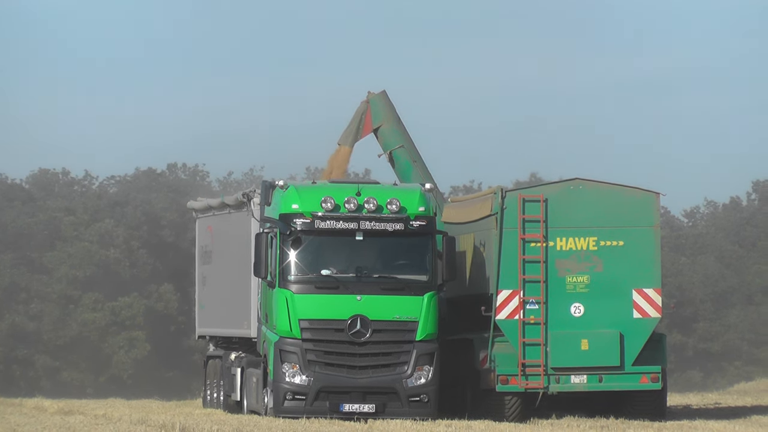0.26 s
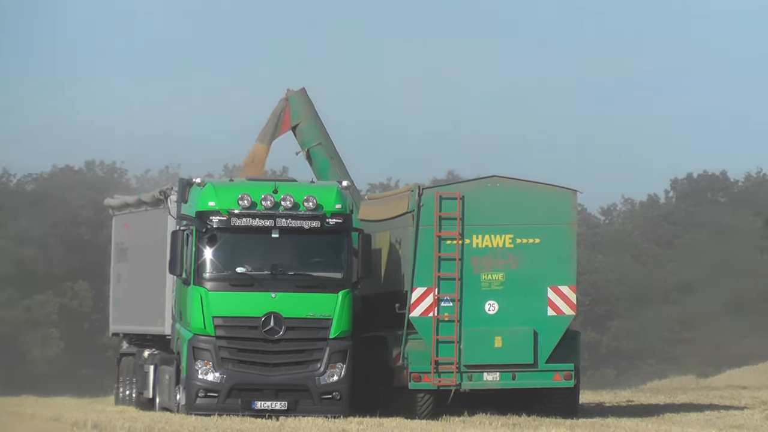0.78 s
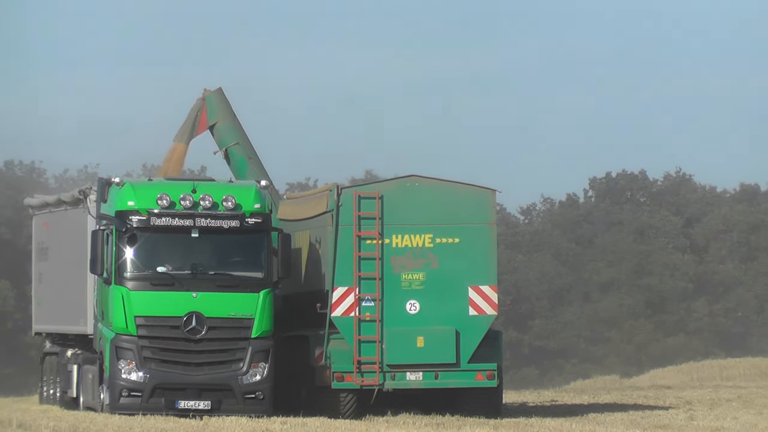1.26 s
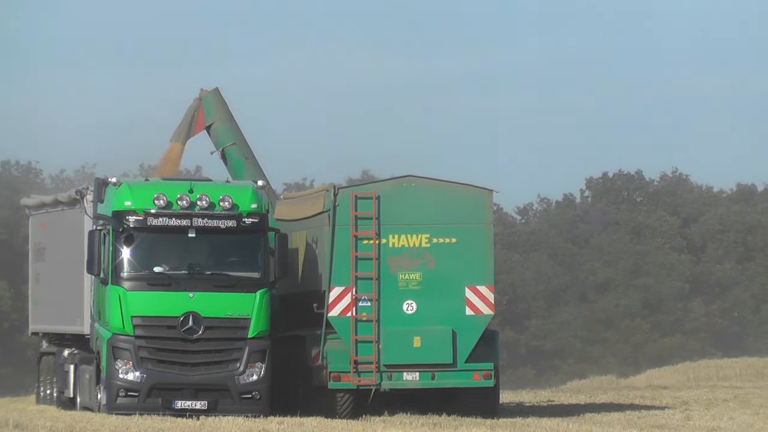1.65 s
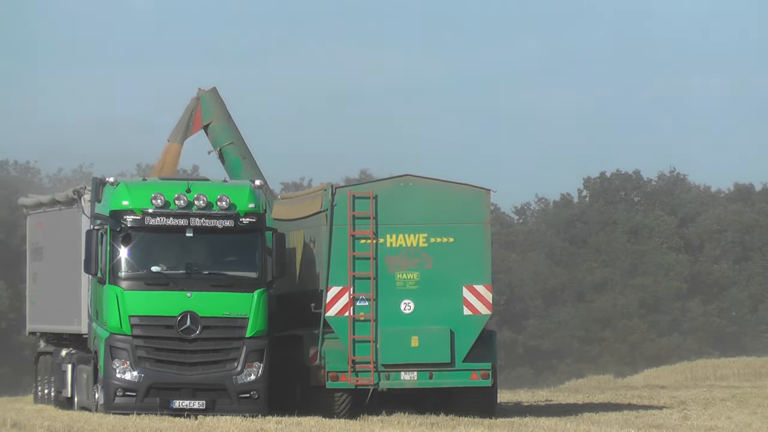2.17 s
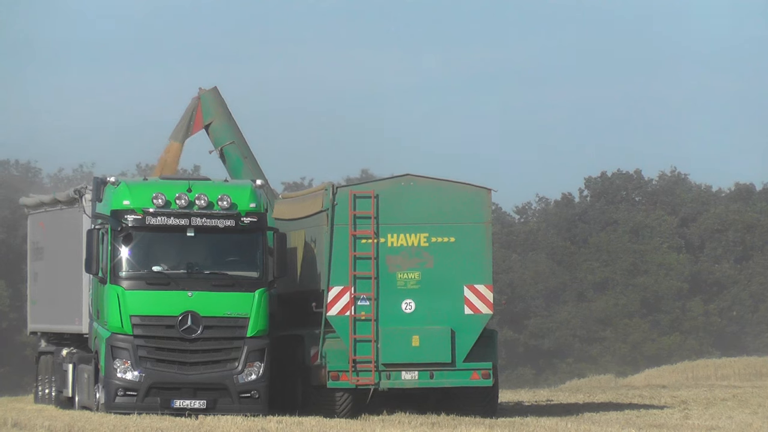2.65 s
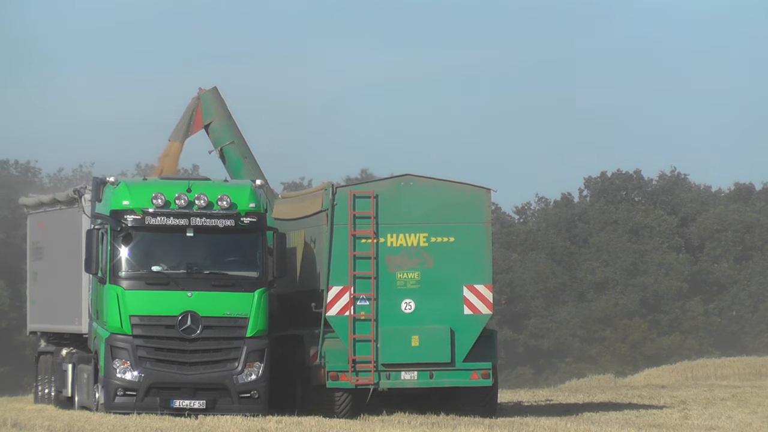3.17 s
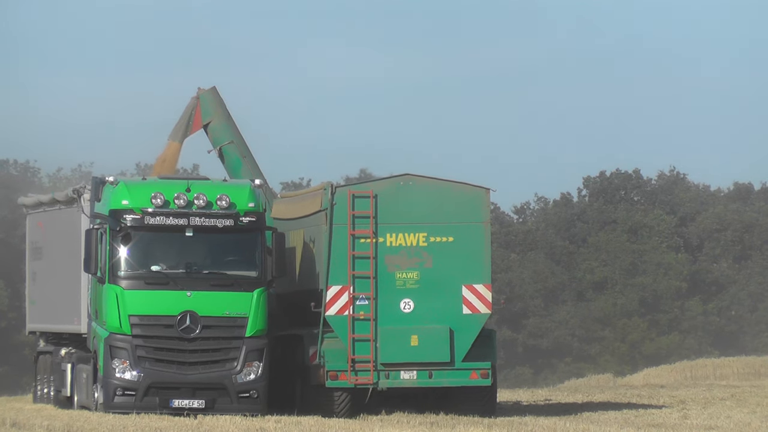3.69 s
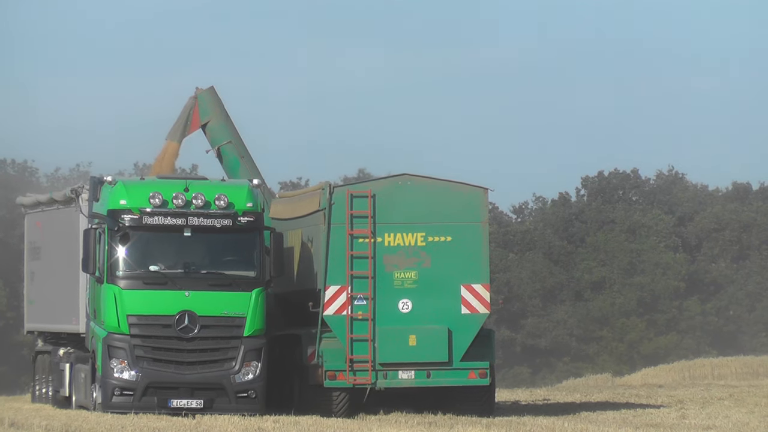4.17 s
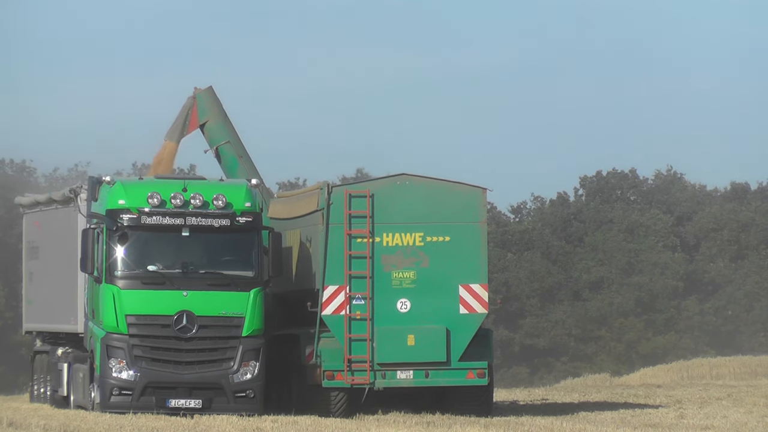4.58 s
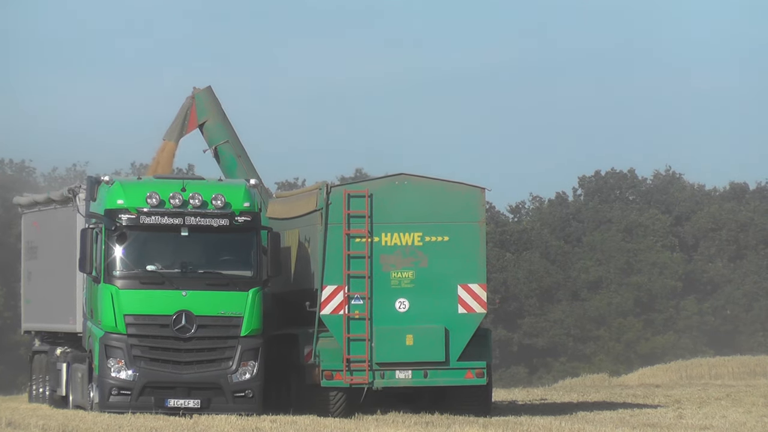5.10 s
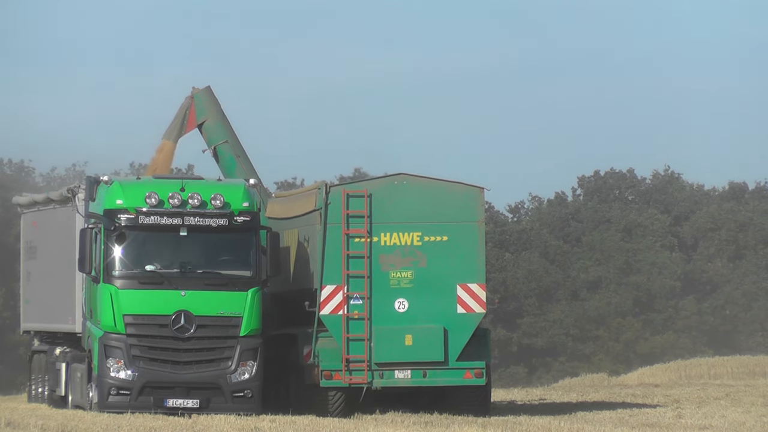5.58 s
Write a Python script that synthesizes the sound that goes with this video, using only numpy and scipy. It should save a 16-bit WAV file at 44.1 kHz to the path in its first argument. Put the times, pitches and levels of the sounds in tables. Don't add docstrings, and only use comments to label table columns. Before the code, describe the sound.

A continuous machine bed of low engine hum, rough tube roar, grain hiss and steady high whine, slightly hollow and phasey from a small camera's microphones. Close, bright straw brushing and brittle ticks crowd the middle, with one dominant snap; afterwards the quieter machine creeps back up, with a few isolated ticks.

```python
import sys
import numpy as np
from scipy import signal
from scipy.fft import rfft, irfft, next_fast_len
from scipy.io import wavfile
from scipy.ndimage import uniform_filter1d, map_coordinates

SR = 44100
rng = np.random.default_rng(int(sys.argv[2]) if len(sys.argv) > 2 else 0)


def pcm_store(signal):
    levels = np.round(np.clip(np.atleast_2d(signal), -1, 1) * 32767)
    wavfile.write(sys.argv[1], SR, levels.astype(np.int16).T)


def decibels_to_gain(level_db):
    exponent = np.asarray(level_db, float) / 20
    return 10 ** exponent


N = 257544

# (time [s], level [dB])
ENGINE_LEVEL = [
    (0, -28),
    (1, -29),
    (1.6, -27.5),
    (2.5, -30),
    (2.8, -28.5),
    (3.5, -26),
    (4.5, -28.5),
    (5.84, -26.5),
]
# (frequency [Hz], level [dB rms])
ENGINE_ORDERS = [(76.8, -43.5), (113, -32.5), (129, -35), (146, -48.5), (163, -40.5), (184, -43.5)]
# (frequency [Hz], density [dB per Hz])
EXHAUST_COLOUR = [(15, -60), (25, -46), (39, -25.5), (50, -23), (62, -17.5), (81, -13.5), (102, -1.5),
                  (125, 3), (160, -3), (195, -6.5), (265, -19.5), (480, -26.5), (620, -61), (1060, -120)]
# (frequency [Hz], density [dB per Hz])
TUBE_COLOUR = [(250, -72), (400, -8.5), (550, -1), (720, 3), (1050, 0.5), (1400, 2), (1800, -5.5),
               (2100, -15), (2600, -44)]
# (frequency [Hz], width [Hz], level [dB])
HOPPER_MODES = [
    (603, 253, 2),
    (773, 107, 4.5),
]
# (frequency [Hz], density [dB per Hz])
GRAIN_COLOUR = [(1500, -8), (2000, -21), (2300, -3.5), (2600, -3), (2900, 0.5), (3300, 0), (3700, -2),
                (4100, -2), (4500, -2.5), (5000, -5), (5700, -8.5), (6600, -13), (7600, -30), (8200, -55)]
# (time [s], frequency [Hz])
MESH_PITCH = [(0, 1665), (.6, 1663), (1.5, 1671), (2.05, 1671), (2.3, 1661), (4.2, 1658), (5.84, 1658)]
# (time [s], lag [ms])
MIRROR_LAG = [(0, .93), (1, .925), (1.8, .88), (2.1, .89), (2.4, 1.12), (2.67, 1.3), (3.1, 1.17),
              (3.6, 1.21), (3.95, 1.17), (4.5, 1.27), (4.85, 1.34), (5.4, 1.395), (5.84, 1.34)]
# (frequency [Hz], level [dB])
MIRROR_COLOUR = [(200, -8.5), (600, -2), (1200, -9.5), (2000, -12), (3000, -1.5), (4500, -7.5), (6500, -13),
                 (9000, -25)]
# (frequency [Hz], density [dB per Hz])
HISS_COLOUR = [(6000, -11), (7000, 0), (7500, -4), (8300, -11.5), (9600, -7.5), (11500, -11),
               (13500, -12.5), (14600, -15), (15300, -25), (15800, -28), (16100, -70)]
# (frequency [Hz], density [dB per Hz])
STRAW_COLOUR = [(1500, -20.5), (3000, -11), (5000, 8), (7000, 5), (8200, -4), (10000, -0.5), (12500, -8),
                (15000, -13), (16000, -14)]
# (start [s], hold [s], stalks [dB], chaff [dB])
STRAW_STROKES = [(1.85, 0.91, -59, -68), (2.08, 0.055, -58, -75), (2.3, 0.13, -52, -72),
                 (2.568, 0.54, -40.5, -47), (2.735, 0.055, -40.5, -52), (3.128, .12, -40, -40),
                 (3.267, .2, -49, -46), (3.503, .55, -51.5, -64), (3.656, 0.1, -45, -60),
                 (3.928, 0.093, -52, -68), (4.196, .2, -53.5, -70)]
# (time [s], bright peak [dB], dull peak [dB], tick [Hz])
STALK_SNAPS = [(2.1114, -18.5, -19, 11500), (2.1745, -28, -25, 9870), (2.3151, -30, -34, 13000),
               (2.4287, -34, -25, 8070), (2.5314, -46, -26, 10100), (2.8821, -24, -18, 9380),
               (2.9054, -28, -34, 9890), (2.926, -29, -23, 9830), (2.9597, -17, -31, 10200),
               (2.9846, -32, -29, 11100), (3.0236, -24, -14, 12500), (3.026, -15, -24, 11900),
               (3.1117, -30, -14.5, 9320), (3.1379, 2.5, -3, 10700), (3.1646, -12, -11.5, 11000),
               (3.235, -21, -23, 11100), (3.3012, -29, -13.5, 11260), (3.3258, -17, -36, 9280),
               (3.3424, -23, -27, 9530), (3.3922, -22, -38, 9440), (3.4042, -18, -34, 12500),
               (3.4575, -31, -37, 11500), (3.5808, -17.5, -36, 8560), (3.7135, -36, -23, 11900),
               (3.9384, -34, -26, 9840), (3.9923, -37, -24, 10700), (4.0203, -20, -31, 9750),
               (4.355, -28, -32, 11500), (4.8821, -29, -23, 11200), (5.1701, -21, -37, 11500)]
# (frequency [Hz], lag [cycles])
REAR_LAG = [(0, .2), (473, 1.5), (2002, 5.5), (2734, 7.5), (4285, 11.5), (6718, 17.5), (7515, 19.5),
            (8731, 22.5), (10045, 25.5), (10895, 27.5), (12532, 31.5), (15331, 38.5), (22050, 55.3)]
# (frequency [Hz], level [dB])
REAR_COLOUR = [(60, 9.5), (250, 1.5), (470, -2), (860, -3), (1230, -1.7), (1620, -6.5), (2000, 4),
               (2740, -2.6), (3100, -13.5), (3500, -6), (5500, -7.5), (8300, -9.5), (10000, -6.5),
               (15000, -7.5)]
# (frequency [Hz], rear share [dB], phase [rad], diffuse level [dB])
SIDE_COLOUR = [(40, -15, 3, -24), (110, -26.5, 2.1, -26), (250, -35, -1.5, -30.5), (500, -24, -2.7, -14.5),
               (810, -11.5, -3, -20), (1300, -12, -4, -18), (1770, -10, -4.5, -24), (2200, -20, -1.5, -13),
               (3020, -12.5, -2.5, -38), (3760, -23, -3, -29), (4300, -70, -5, -68)]
# (frequency [Hz], upright [dB], bent [dB], risen [dB])
BODY_SCATTER = [
    (470, -30, -11, -8),
    (838, -30, -33, -3),
    (1260, -5, -35, -6),
]

BEND_S, RISE_S, MOVE_S = 2.34, 3.53, 0.55


def unit(x):
    return x / np.sqrt(np.mean(x ** 2) + 1e-20)


def along(points, hz, column=1):
    table = np.transpose(points)
    return np.interp(np.log(hz + 1), np.log(table[0] + 1), table[column])


def curves(rows):
    s, *columns = np.transpose(rows)
    return [np.interp(np.arange(N) / SR, s, column) for column in columns]


def wobble(rate):
    knots = rng.standard_normal(int(N * rate / SR) + 4)
    return map_coordinates(knots, [np.arange(N) * rate / SR])


def filtered(x, response):
    m = next_fast_len(N + 8192)
    return irfft(rfft(x, m) * response(np.fft.rfftfreq(m, 1 / SR)), m)[..., :N]


def shape(points):
    return lambda hz: decibels_to_gain(along(points, hz)) * (hz >= points[0][0])


def modes(table):
    def response(f):
        total = 0
        for k, (centre, width, db) in enumerate(table):
            mode = 1j * f * width / (centre * centre - f * f + 1j * f * width)
            total = total + (-1) ** k * decibels_to_gain(db / 2) * mode
        return total ** 2
    return response


def rush(response, patchy_db):
    z = signal.stft(rng.standard_normal(N), nperseg=512)[2]
    field = uniform_filter1d(rng.standard_normal(z.shape), size=5, axis=0)
    field = uniform_filter1d(field, size=12, axis=1)
    noise = signal.istft(z * decibels_to_gain(patchy_db * unit(field)), nperseg=512)[1][:N]
    return unit(filtered(noise, response))


def tone(hz, wander, flutter_db, rate):
    phase = 2 * np.pi * np.cumsum(hz * np.ones(N)) / SR
    phase = phase + wander * wobble(rate) + rng.uniform(0, 2 * np.pi)
    return unit(decibels_to_gain(flutter_db * wobble(rate)) * np.sin(phase))


def ramp(middle_s, length_s):
    return np.clip((np.arange(N) / SR - middle_s) / length_s + .5, 0, 1)


def posed(upright, bent, risen):
    return upright + (bent - upright) * ramp(BEND_S, MOVE_S) + (risen - bent) * ramp(RISE_S, MOVE_S)


def engine():
    orders = sum(decibels_to_gain(db + 25.5) * tone(hz, wander=0.82, flutter_db=1.5, rate=4) for hz, db in ENGINE_ORDERS)
    exhaust = decibels_to_gain(-3.5) * rush(shape(EXHAUST_COLOUR), patchy_db=0.7)
    return decibels_to_gain(curves(ENGINE_LEVEL)[0]) * (orders + exhaust)


def auger():
    heap = ramp(4.6, 0.91)
    heap_loss_db = -1.5 * heap
    bending = np.sin(np.pi * ramp(BEND_S, MOVE_S))

    tube_db = posed(-30.5, -30, -30) + heap_loss_db
    tube = decibels_to_gain(tube_db + 0.96 * wobble(8.3)) * rush(shape(TUBE_COLOUR), patchy_db=0.68)
    hopper = decibels_to_gain(posed(-37.5, -35, -47.5)) * rush(modes(HOPPER_MODES), patchy_db=3.0)

    slugs = decibels_to_gain(0.33 * wobble(38))
    grain_db = posed(-34, -34, -33) + heap_loss_db
    grain = decibels_to_gain(grain_db) * slugs * rush(shape(GRAIN_COLOUR), patchy_db=0.84)
    spout_db = -56.5 + 12 * heap + 8 * bending
    spout = decibels_to_gain(spout_db) * rush(modes([(2875, 90, 0)]), patchy_db=0.3)

    mesh_hz, = curves(MESH_PITCH)
    whine = decibels_to_gain(-38) * tone(mesh_hz, wander=0.18, flutter_db=1.5, rate=11)
    moan_db = posed(-45.5, -41.5, -46.5) + 9 * bending + 1.5 * wobble(2.5)
    moan = decibels_to_gain(moan_db) * tone(.6195 * mesh_hz, wander=0.79, flutter_db=4.0, rate=18)
    return tube + hopper + grain + spout + whine + moan


def moving_reflection(far):
    lag_ms, = curves(MIRROR_LAG)
    reflected = filtered(far, shape([(1, -33)] + MIRROR_COLOUR + [(20000, -60)]))
    bounce = map_coordinates(reflected, [np.arange(N) - lag_ms * SR / 1000])
    return posed(0.61, .45, 0.49) * bounce


def hiss():
    return decibels_to_gain(-53) * rush(shape(HISS_COLOUR), patchy_db=0)


def stroke(start_s, hold_s):
    attack_s, t60_s = 0.036, 0.24
    t = np.arange(N) / SR - start_s
    return np.clip(t / attack_s, 0, 1) * decibels_to_gain(-60 * np.clip(t - hold_s, 0, 2) / t60_s)


def brushing():
    clumps = uniform_filter1d(1. * (rng.random(N) < .004), size=30) * 30
    cracks = rng.standard_normal(N) * (1 + 1.7 * clumps)
    cracks = cracks * decibels_to_gain(1.7 * wobble(70) + 2.0 * wobble(16))
    brush = unit(filtered(cracks, shape(STRAW_COLOUR + [(17000, -90)])))
    swells = np.array([stroke(s, hold_s) for s, hold_s, *_ in STRAW_STROKES])
    stalks, chaff = decibels_to_gain(np.transpose(STRAW_STROKES)[2:]) @ swells
    rustle = decibels_to_gain(2.2 * wobble(90) + 1.6 * wobble(25.1)) * rush(modes([(11500, 4300, 0)]), patchy_db=1.0)
    return decibels_to_gain(3.0) * stalks * brush + chaff * rustle


def snap(bright_db, dull_db, tick_hz):
    t = np.arange(400) / SR
    a, b, c, d = rng.uniform(0.784, 1.24, 4)

    def ring(hz):
        return np.sin(2 * np.pi * hz * t)

    def decay(db, t60_s):
        return decibels_to_gain(db - 60 * t / t60_s)

    tick = .7 * ring(.72 * tick_hz) + .8 * ring(.86 * tick_hz * a) + .8 * ring(tick_hz) + .4 * ring(1.15 * tick_hz)
    out = decay(bright_db + 1.5, .0026) * tick
    out += decay(dull_db + 7, .003) * (ring(3900 * d) + .7 * ring(5200 * a))
    out += decay(bright_db - 10, .004) * rng.standard_normal(len(t))
    out += decay(dull_db - 4.5, 0.012) * (ring(800 * b) + 0.51 * ring(1500 * c))
    return out * (1 - np.exp(-t / 0.000097))


def straw():
    out = brushing()
    for s, bright_db, dull_db, tick_hz in STALK_SNAPS:
        crack = snap(bright_db, dull_db, tick_hz)
        out[round((s + .0012) * SR):][:len(crack)] += crack
    return out


def gain_control():
    duck_s, attack_s, hold_s, recover_s = 3.119, 0.009, 0.56, 1.0
    t = np.maximum(np.arange(N) / SR - duck_s, 0)
    recovery = np.exp(-np.maximum(t - hold_s, 0) / recover_s)
    return 1.25 - 7 * (1 - np.exp(-t / attack_s)) * recovery


def scene():
    far = engine() + auger()
    return np.array([far + moving_reflection(far) + hiss() + straw()] * 2)


def roll_off(x):
    return signal.sosfilt(signal.butter(12, 15960, fs=SR, output="sos"), x)


def record(dry):
    front = dry[0]
    rear = filtered(front, lambda hz: decibels_to_gain(along(REAR_COLOUR, hz))
                    * np.exp(-2j * np.pi * np.interp(hz, *np.transpose(REAR_LAG))))
    z = signal.stft(dry, nperseg=256)[2]
    random_phase = np.exp(2j * np.pi * rng.random(z.shape))
    scatter = signal.istft(z * random_phase, nperseg=256)[1][:, :N]

    mid = front + rear + decibels_to_gain(-15) * filtered(scatter[0], lambda hz: hz > 1500)
    for centre_hz, *pose_db in BODY_SCATTER:
        band = filtered(scatter[0], lambda hz: np.exp(-((hz - centre_hz) / 130) ** 2))
        mid = mid + decibels_to_gain(posed(*pose_db) + 4) * band

    side = filtered(rear, lambda hz: decibels_to_gain(along(SIDE_COLOUR, hz)) * np.exp(1j * along(SIDE_COLOUR, hz, column=2)))
    side = side + filtered(scatter[1], lambda hz: decibels_to_gain(along(SIDE_COLOUR, hz, column=3)))
    both = np.clip(decibels_to_gain(gain_control()) * np.array([mid + side, mid - side]), -1, 1)

    top = filtered(both, lambda hz: hz > 15200)
    both = both - top * np.clip(4 * wobble(22) - 1.5, 0, 1)
    mix = filtered(both, lambda hz: hz < 15830)
    return roll_off(mix)


dry = scene()
out = record(dry)
pcm_store(out)
```